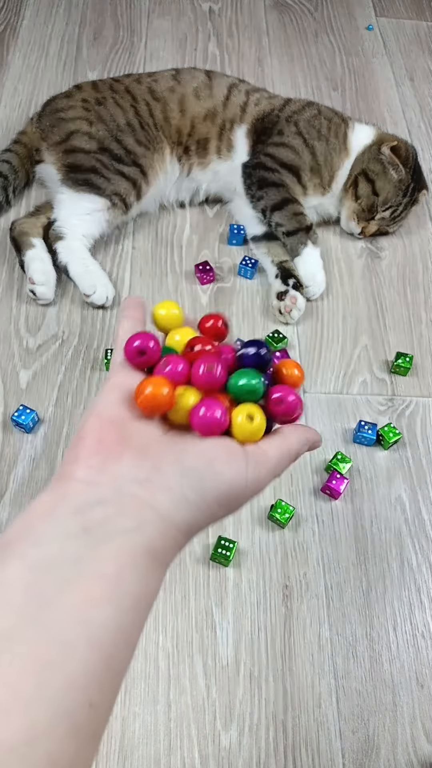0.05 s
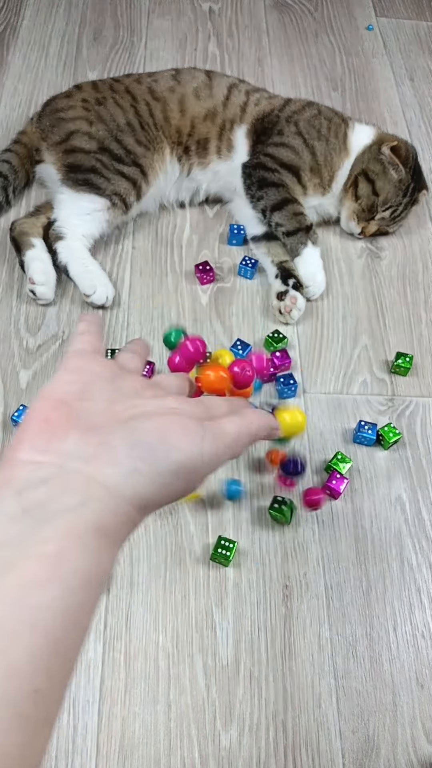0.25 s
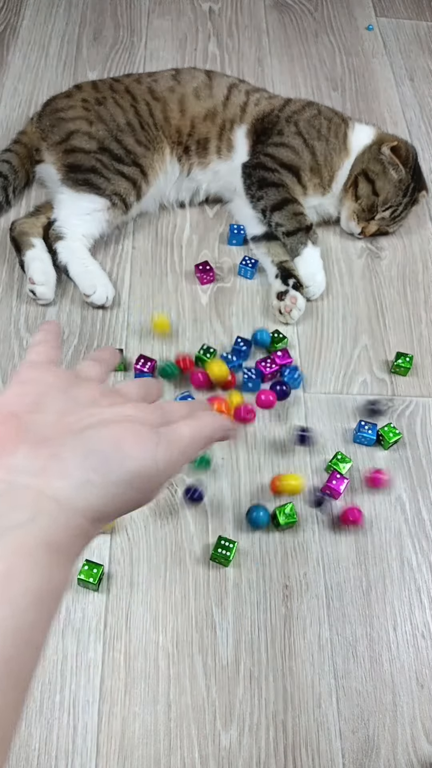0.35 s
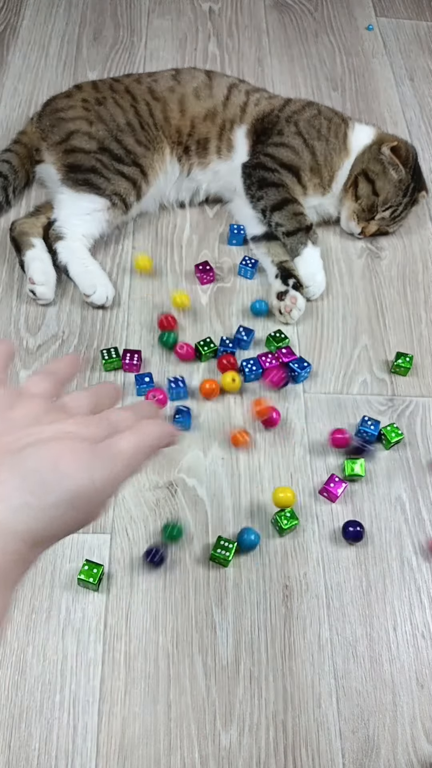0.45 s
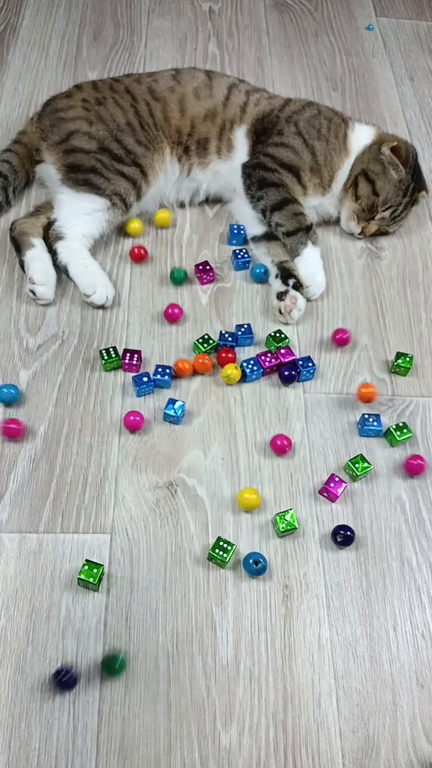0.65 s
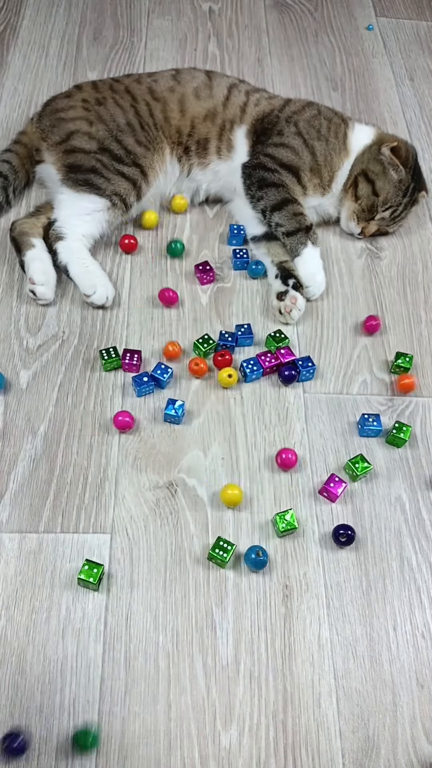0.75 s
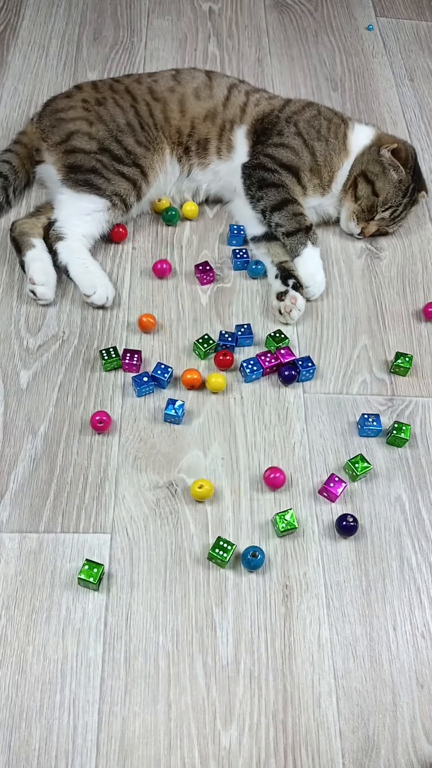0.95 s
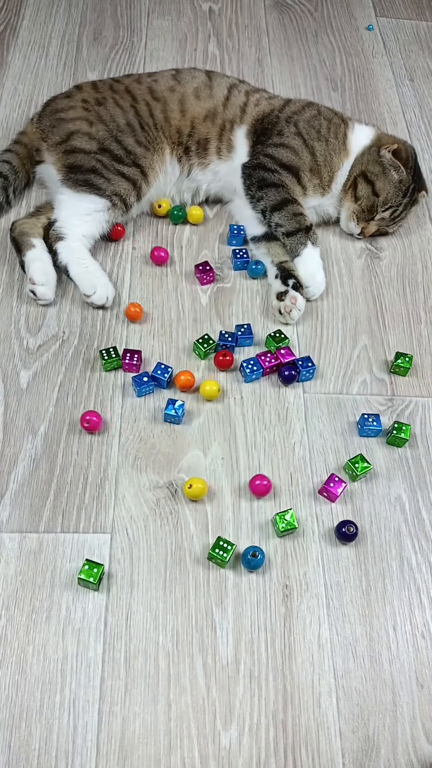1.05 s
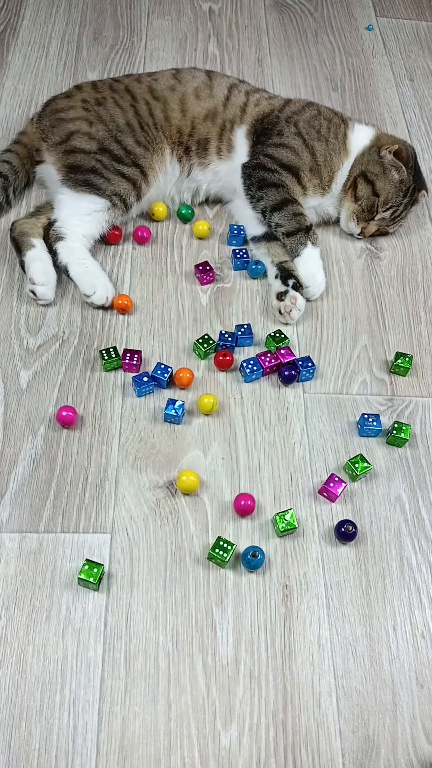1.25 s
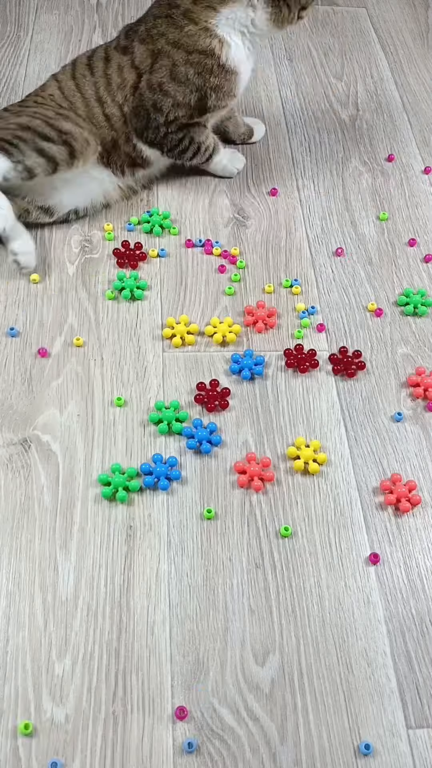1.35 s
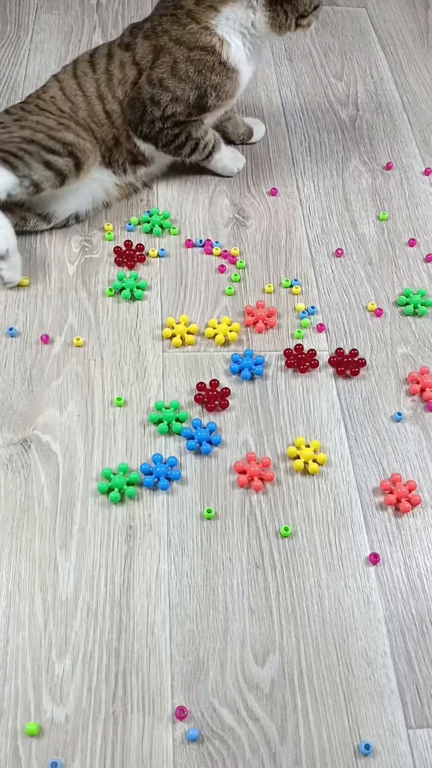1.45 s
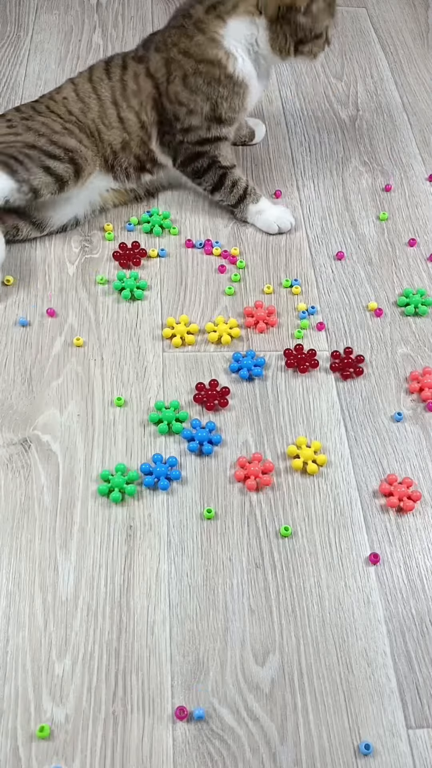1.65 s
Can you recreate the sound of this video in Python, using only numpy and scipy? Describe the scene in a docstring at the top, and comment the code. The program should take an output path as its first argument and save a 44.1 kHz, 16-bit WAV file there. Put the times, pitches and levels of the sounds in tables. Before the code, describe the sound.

Beads spill from a hand, clattering and bouncing on a hard floor, then rolling apart.

```python
"""A small room with a hard floor, the microphone close to where a handful of beads is tipped out.
First the beads tick and rustle in the cupped palm. Then they land and bounce, knocking on the floor,
clack against each other and some dice, and roll apart over the floor's grain.
The sound breaks off abruptly; after a short gap a thin, faint rolling of smaller beads follows."""
import sys
import numpy as np
from scipy import signal
from scipy.io import wavfile
from scipy.ndimage import uniform_filter1d

SR = 44100
rng = np.random.default_rng(int(sys.argv[2]) if len(sys.argv) > 2 else 0)


def bounce(signal):
    """Save signal as a 16-bit WAV file at the path given by the first command-line argument."""
    frames = np.transpose(np.atleast_2d(signal))
    limited = np.clip(frames, -1, 1)
    pcm = np.round(limited * 32767).astype(np.int16)
    wavfile.write(sys.argv[1], SR, pcm)


N = 74970


def bounces():
    """Beads land and bounce on the floor, close to the microphone."""
    # main landings: (time [s], knock level [dB], click relative to the knock [dB])
    landings = [(0.2368, -15, 2.5), (0.2402, -8.5, -1), (0.2832, -14.5, -11), (0.2918, -9, -0.5),
                (0.2997, -6.5, 1), (0.3058, -6, -24), (0.3097, -11, -3), (0.3228, -14.5, 1),
                (0.3242, -6, 1.5), (0.3338, -9.5, 3), (0.3433, -15, -10.4), (0.3615, -10.5, 1),
                (0.3662, -9.5, 2), (0.3873, -8, -10), (0.3925, -15, 8), (0.4034, -13.5, -21),
                (0.4122, -13.4, -9), (0.4168, -17, 4), (0.4226, -6, -2), (0.4554, -8, -8),
                (0.4723, -29, 14.5), (0.4952, -21, -2), (0.5083, -20.5, 4.5), (0.5604, -20.5, -15),
                (0.5771, -18, 2.5), (0.585, -19, 2), (0.6314, -18, 2.5), (0.6462, -31, -11),
                (0.6699, -21.5, 4), (0.7311, -24, 3.5), (0.7376, -31.5, -15), (0.782, -30, -2),
                (0.9935, -35, 7), (1.1316, -37.5, 9), (1.1535, -36, 8)]
    # spectrum of the contact click: (frequency [Hz], level [dB])
    click_colour = [(100, -16), (600, -4.5), (1500, 1.5), (3000, -3.5), (6400, -5), (7700, -16.5),
                    (9500, -20), (11500, -12), (13500, -18), (16000, -19)]
    out, click = np.zeros(N), pulse(click_colour)
    lesser_landings = [(s, db, -13) for s, db in lesser_hits(count=130, column=1)]
    for s, db, click_db in list(landings) + lesser_landings:
        add(out, s, amp(db) * knock(amp(click_db - 1.5) * click))
    return out


def knock(click, spot_spread=0.035):
    """A sharp contact click, a few swelling cycles of the floor and a faint ring of the boards."""
    # the floor's answer to a blow: (frequency [Hz], level [dB], time to swell [s])
    floor_modes = [(160, -26.5, 0.0079), (276, -21.5, 0.0058), (439.7, -19, 0.0028), (888, -23.5, 0.0025),
                   (1035, -1.5, 0.00082), (1244, -21, 0.0017), (1697, -16.5, 0.0006)]
    # longer ringing of the boards: (frequency [Hz], level [dB], t60 [s])
    board_modes = [(277.3, -36, .16), (378, -39, 0.2), (898, -35.5, .12), (985, -27, 0.13),
                   (1070, -35, 0.12), (1950, -40, 0.07)]
    spots = rng.normal(size=len(floor_modes))  # each landing spot sounds a little different
    t = np.arange(SR // 6) / SR
    out = np.zeros(len(t))
    for (hz, db, swell), spot in zip(floor_modes, spots):
        envelope = amp(db) * t / swell * np.exp(1 - t / swell)
        out -= envelope * np.cos(2 * np.pi * hz * (1 + spot_spread * spot) * t)
    for (hz, db, t60), spot in zip(board_modes, spots[::-1]):
        out += amp(db) * decay(t, t60) * np.sin(2 * np.pi * (hz * t + spot))
    add(out, 0, -click)
    return out


def collisions(cupped_until_s=0.2):
    """Beads hit one another and the dice; the cupped hand softens and narrows the first ticks."""
    # main collisions: (time [s], level [dB], ring pitch [Hz], overtones relative to the ring [dB])
    hits = [(0.11, -36.5, 4200, -40), (0.1233, -33, 3900, -35), (0.1351, -30, 4750, -34),
            (0.171, -41, 5300, -24.5), (0.1841, -42.5, 5000, -34), (0.2398, -4, 6430, -4),
            (0.2838, -14.5, 5330, 1), (0.2877, -10, 4428, -14), (0.307, -11, 5430, -7),
            (0.328, -2, 6730, -16), (0.3312, -3, 6020, -8.5), (0.334, -7.5, 6000, -13),
            (0.3574, -14.5, 6340, -7), (0.3601, -5.5, 4400, -5), (0.377, -13.5, 6600, -20),
            (0.3978, -14, 5970, -21), (0.405, -3, 6600, -10), (0.4203, -9.5, 6670, -9.5),
            (0.4551, -16, 5660, -6), (0.6536, -23, 5770, -23.5), (0.752, -16, 5540, -22),
            (0.9215, -25.5, 4830, -42), (1.0943, -29.5, 4860, -5.5), (1.1779, -26, 4780, -15.5),
            (1.32, -25.5, 4590, -20)]
    out = np.zeros(N)
    for s, db, hz, overtone_db in hits:
        hit = amp(db) * clack(hz, overtone_db)
        add(out, s, resonate(hit, hz=4100, width_hz=2800) if s < cupped_until_s else hit)
    for s, db in lesser_hits(count=150, column=2):
        add(out, s, amp(db) * clack(rng.uniform(3500, 6000), overtone_db=-20.5))
    return out


def clack(hz, overtone_db, ping_hz=11780, reach_hz=798):
    """Two hard bodies meet: a short ring, a splash of overtones, an after-ring, the floor's echo."""
    # spectrum of the high overtones: (frequency [Hz], level [dB])
    overtone_colour = [(100, -27), (6000, -12.5), (8500, -6.5), (12000, -2), (13500, -11.5), (16000, -13.5)]
    # after-ring of the beads: (frequency [Hz], level [dB])
    bead_modes = [(4350, -11), (4727, -19), (6350, -20)]
    ring = contact_ring(hz)
    t = np.arange(len(ring)) / SR
    burst = rng.standard_normal(len(t)) * np.exp(-t / 0.0013)
    splash = np.convolve(burst, pulse(overtone_colour, size=128))[:len(t)]
    out = ring + amp(overtone_db) * splash / abs(splash).max()
    ping = detuned_sine(t, ping_hz, spread=0.013) * np.exp(-t / 0.004)  # one overtone rings on
    out += amp(overtone_db - 16.5) * ping
    for mode_hz, db in bead_modes:
        stirred = amp(db) / (1 + ((hz - mode_hz) / reach_hz) ** 2)  # most when near the pitch
        out += stirred * detuned_sine(t, mode_hz, spread=0.008) * np.exp(-t / 0.003)
    floor_echo_s = 0.00035 * rng.uniform(1, 2.5)
    add(out, floor_echo_s, amp(-7.5) * out)
    return out


def contact_ring(hz, q=2.2, resonance_db=9.5, swell_width_hz=2740):
    """A collision's broad resonance, which takes a few cycles to build up; peak one."""
    # spectrum of a typical collision: (frequency [Hz], level [dB])
    clack_colour = [(100, -56.5), (900, -36.5), (1700, -16), (3000, -5.5), (4400, -5), (6700, -1.5),
                    (7700, -13), (9500, -34), (16000, -53)]
    f = np.geomspace(100, SR / 2, 256)
    colour = read(clack_colour, f * (6250 / hz) ** 0.45)  # partly follows the pitch
    colour += 10 * np.log10(1 + amp(resonance_db) ** 2 / (1 + (q * (f / hz - hz / f)) ** 2))
    impact = pulse(np.transpose([f, colour]), size=2048)
    radius = np.exp(-np.pi * swell_width_hz / SR)
    poles = [1, -2 * radius * np.cos(2 * np.pi * hz / SR), radius ** 2]
    ring = signal.lfilter(poles[::-1], poles, impact)  # the all-pass delays the ring's peak
    return ring / abs(ring).max()


def lesser_hits(count, column):
    """Random times and levels of lesser knocks (column 1) or clacks (2), fading as the beads settle."""
    # strength of the jostling: (time [s], knock level [dB], clack level [dB])
    jostle = [(.245, -15, -37), (0.277, -24, -35), (.31, -38, -29), (.43, -37, -25), (.48, -29, -26),
              (.66, -43, -39), (0.801, -43, -63), (1.339, -53.5, -60.5)]
    curve = np.transpose(jostle)
    start, end = curve[0, 0], curve[0, -1]
    times = start + (end - start) * (np.arange(count) + 2 * rng.random(count)) / count
    scatter_db = 1.5 * np.clip(rng.normal(size=count), -2, 2)
    return zip(times, np.interp(times, curve[0], curve[column]) + scatter_db)


def grains(per_s=2500, spread_db=2, lump_db=1.5):
    """Beads trip over the grain of the floor or of each other: tiny knocks that come in lumps."""
    size = amp(spread_db * np.minimum(rng.exponential(1, N), 4)) * rng.choice([-1, 1], N)
    lumps = amp(lump_db * unit(uniform_filter1d(rng.standard_normal(N), size=900)))
    return size * lumps * (rng.random(N) < per_s / SR)


def rolling(curve, colour, modes=()):
    """A stream of tiny knocks, with its colour and the resonances it stirs."""
    ticks = grains()
    ringing = sum(amp(db) * resonate(ticks, hz, width) for hz, width, db in modes)
    return level(curve) * coloured(ticks + ringing, colour)


def chatter():
    """The beads rub together as they land."""
    # strength of the rubbing: (time [s], level [dB])
    curve = [(.24, -29.5), (.275, -36), (.3, -30), (.335, -27.5), (.41, -27), (.46, -30.5), (.52, -47.5),
             (.66, -45.5), (.8, -63)]
    # its spectrum: (frequency [Hz], density [dB])
    colour = [(100, -22.5), (400, 6), (1800, -2), (2600, -3.5), (4200, 2), (6700, 1), (8000, -16),
              (11500, -12), (13500, -19.5), (16000, -18.5)]
    return rolling(curve, colour)


def floor_roll(middle_hz=470, middle_width_hz=740):
    """Beads rumble apart across the floor; the low middle drops away for a moment and returns."""
    # strength of the rolling: (time [s], level [dB])
    curve = [(.24, -91), (.4, -33), (.8, -45), (1.0, -45), (1.15, -46), (1.34, -48.5)]
    # its spectrum: (frequency [Hz], density [dB])
    colour = [(30, -28), (70, -12.5), (130, -3), (260, -2.5), (330, -17.5), (620, -9.5), (830, 1.5),
              (1500, -4.5), (3200, -13.5), (6300, -21.5), (7500, -36.5), (10000, -39), (12000, -27),
              (14000, -42.5)]
    # floor resonances: (frequency [Hz], width [Hz], gain [dB])
    modes = [(221.2, 45, 1.5), (1098, 65, -5.5)]
    # low middle of the rumble: (time [s], level [dB])
    middle_curve = [(.5, -49.5), (1.13, -51), (1.17, -69), (1.26, -60), (1.3, -53.5)]
    roll = rolling(curve, colour, modes)
    middle = resonate(grains(), middle_hz, middle_width_hz)
    middle = resonate(middle, middle_hz, middle_width_hz)
    return roll + level(middle_curve) * unit(middle)


def small_beads(slope_hz=249.3, cut_db=-13.5):
    """Smaller beads roll thinly, with two small bumps; the sound dulls and brightens again."""
    # strength of the rolling: (time [s], level [dB])
    curve = [(1.37, -61), (1.47, -56), (1.52, -53), (1.59, -61.5), (1.62, -55.5), (1.7, -58)]
    # its spectrum: (frequency [Hz], density [dB])
    colour = [(100, -37), (770, -30), (880, -8.5), (1450, -3.5), (2500, -16.5), (3000, -16), (9500, -32),
              (11300, -14.5), (14000, -33.5)]
    # resonances it stirs: (frequency [Hz], width [Hz], gain [dB])
    modes = [(895, 30, 9), (1080, 69, 5.5)]
    # bumps along the way: (time [s], level [dB])
    bumps = [(1.409, -36.5), (1.511, -40.5)]
    # edge above which the treble drops: (time [s], frequency [Hz])
    treble_edge = [(1.37, 2343), (1.52, 2614), (1.55, 1802), (1.6, 1917), (1.7, 2790)]
    out = rolling(curve, colour, modes)
    for s, db in bumps:
        add(out, s, amp(db) * resonate(pulse(colour), hz=1300, width_hz=1000))
    hz, when, spectrum = signal.stft(out, SR, nperseg=512)
    edge_hz = np.interp(when, *np.transpose(treble_edge))
    above = np.clip((hz[:, None] - edge_hz) / slope_hz, 0, 1)
    return signal.istft(spectrum * amp(cut_db * above), SR, nperseg=512)[1][:N]


def palm_rustle():
    """Beads shift faintly in the palm."""
    # strength of the rustle: (time [s], level [dB])
    curve = [(.016, -65), (.06, -86.5), (.13, -68), (.2, -76)]
    # its spectrum: (frequency [Hz], density [dB])
    colour = [(900, -36), (2400, -12), (3800, 0), (5000, -2.5), (6500, -35.5)]
    return rolling(curve, colour)


def room(x, onset_s=0.002):
    """The small room answers: a few close echoes, quick scatter from things nearby and a tail."""
    # early reflections at the microphone: (delay [s], level [dB])
    echoes = [(.0079, -21), (0.0107, -23), (0.0157, -17)]
    # decay of the tail: (frequency [Hz], t60 [s])
    tail_t60 = [(150, 1), (1000, 0.19), (5000, 0.16), (12000, 0.17)]
    # spectrum of the tail: (frequency [Hz], level [dB])
    tail_colour = [(100, -1), (300, -0.5), (650, -3), (1000, -5), (1700, -7), (3000, -3), (6000, -8.5),
                   (9000, 0), (14000, -2)]
    t = np.arange(SR) / SR
    hz, when, spectrum = signal.stft(rng.standard_normal(SR), SR, nperseg=256)
    t60 = read(tail_t60, hz)[:, None]
    equal_energy = np.sqrt(2 * np.log(1000) / t60 / SR)
    spectrum *= decay(when, t60) * amp(read(tail_colour, hz))[:, None] * equal_energy
    tail = signal.istft(spectrum, SR, nperseg=256)[1][:SR]
    near = rng.standard_normal(SR) * decay(t, t60=0.16)
    response = tail + amp(-14) * near / np.linalg.norm(near)
    response *= 1 - np.exp(-(t / onset_s) ** 2)
    for s, db in echoes:
        add(response, s, amp([db]))
    return signal.fftconvolve(x, response)[:N]


def room_tone():
    """A quiet, steady hiss lies under everything."""
    # spectrum of the background: (frequency [Hz], density [dB])
    colour = [(30, -2.5), (150, 0.5), (400, -10), (2000, -5.5), (8000, -22.5), (16000, -14.5)]
    return amp(-82) * coloured(rng.standard_normal(N), colour)


def amp(db):
    """Decibels to gain."""
    return 10 ** (np.asarray(db) / 20)


def unit(x):
    """Scales to an rms of one."""
    return x / np.sqrt(np.mean(x ** 2) + 1e-20)


def decay(t, t60):
    """An envelope that falls 60 dB in t60 seconds."""
    return np.exp(-np.log(1000) * t / t60)


def detuned_sine(t, hz, spread):
    """A sine at a random pitch near hz."""
    return np.sin(2 * np.pi * hz * (1 + spread * rng.normal()) * t)


def read(points, hz):
    """Reads a spectrum table on a log-frequency axis."""
    f, value = np.transpose(points)
    return np.interp(np.log(hz + 1), np.log(f), value)


def level(points):
    """A (time [s], level [dB]) curve as gain per sample, silent before its first point."""
    return amp(np.interp(np.arange(N) / SR, *np.transpose(points), left=-200))


def add(mix, s, sound):
    """Adds a sound to the mix at time s."""
    part = mix[max(round(s * SR), 0):][:len(sound)]
    part += sound[:len(part)]


def pulse(colour, size=4096):
    """The shortest causal pulse with this spectrum, peak one."""
    log_gain = np.log(amp(read(colour, abs(np.fft.fftfreq(size, 1 / SR)))))
    minimum_phase = np.exp(np.conj(signal.hilbert(log_gain)))
    wave = np.fft.ifft(minimum_phase).real[:size // 2]
    return wave / abs(wave).max()


def coloured(x, colour):
    """Gives x a spectrum, at an rms of one."""
    return unit(signal.fftconvolve(x, pulse(colour))[:N])


def resonate(x, hz, width_hz):
    """A resonance of gain one."""
    return signal.lfilter(*signal.iirpeak(hz, hz / width_hz, SR), x)


def scene():
    """The spill and its rolling, broken off; then the small beads."""
    break_s, resume_s = 1.344, 1.370
    t = np.arange(N) / SR
    knocks, clacks = amp(0.89) * bounces(), amp(-2) * collisions()
    spill = knocks + clacks + room(knocks + amp(-3.5) * clacks)
    spill += palm_rustle() + floor_roll() + chatter()
    background = room_tone()
    return (spill * (t < break_s) + small_beads() * (t > resume_s) + background)[None]


def record(dry):
    """One close microphone that drops the deep bass; then the band limit."""
    low_cut_hz, band_limit_hz = 105, 15800
    thin = signal.sosfilt(signal.butter(2, low_cut_hz, "highpass", fs=SR, output="sos"), dry)
    lowpass = signal.firwin(511, band_limit_hz, window=("kaiser", 9), fs=SR)
    return signal.oaconvolve(thin, lowpass[None], "same")


dry = scene()
out = record(dry)
bounce(out)
```